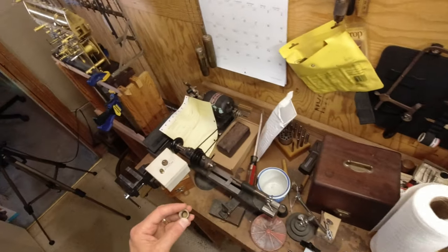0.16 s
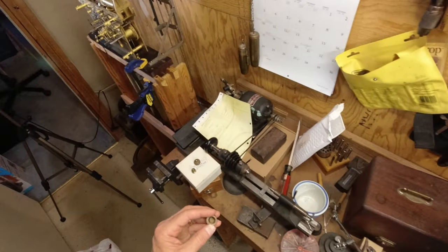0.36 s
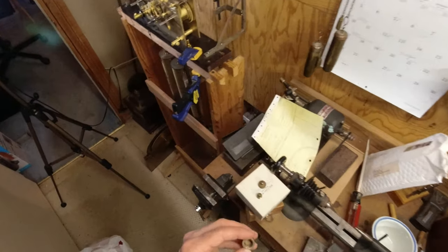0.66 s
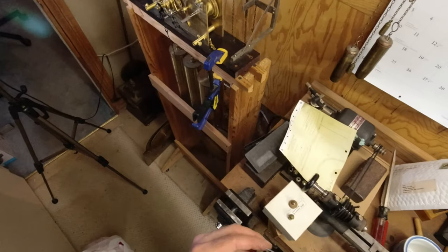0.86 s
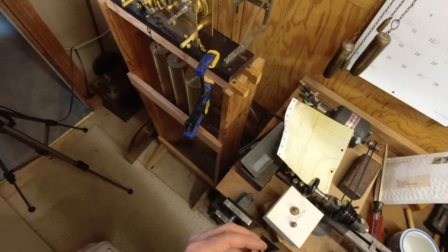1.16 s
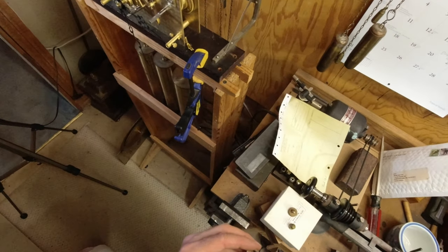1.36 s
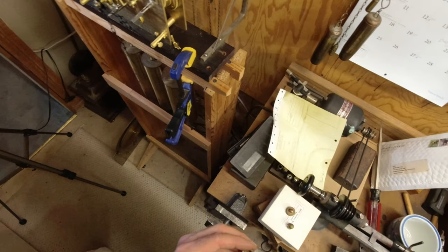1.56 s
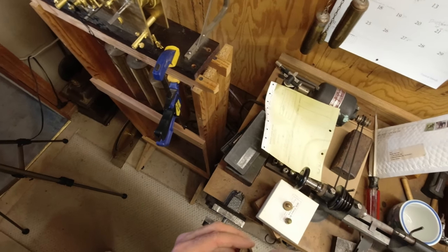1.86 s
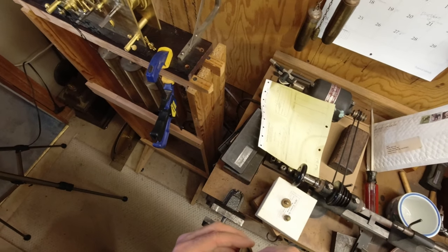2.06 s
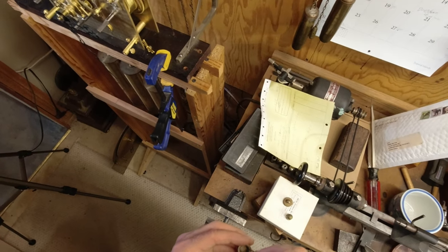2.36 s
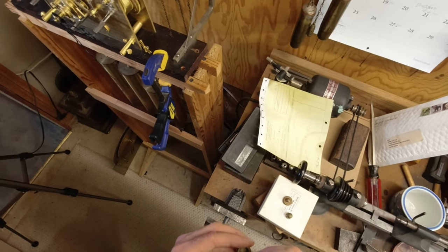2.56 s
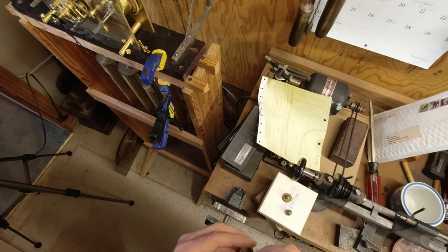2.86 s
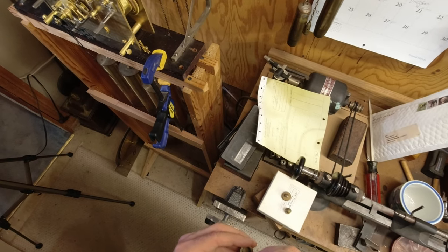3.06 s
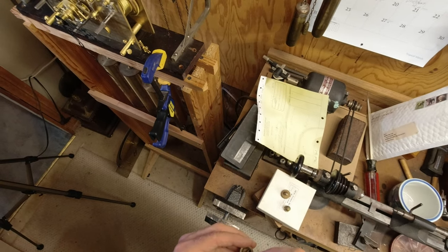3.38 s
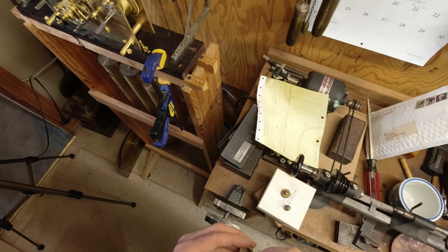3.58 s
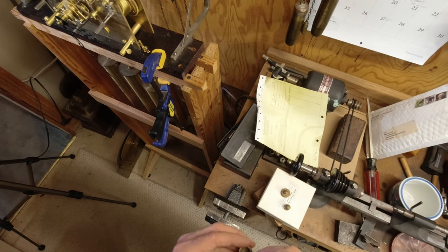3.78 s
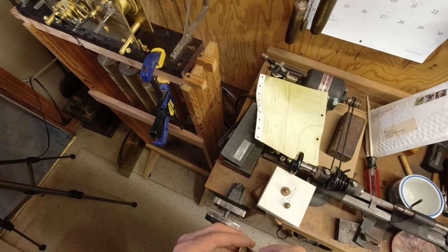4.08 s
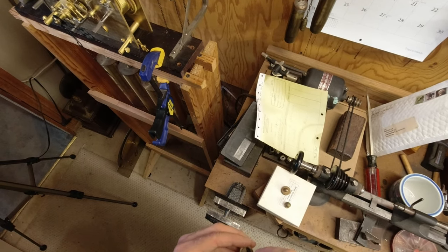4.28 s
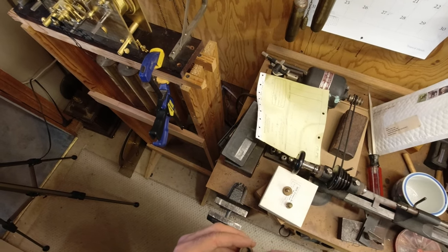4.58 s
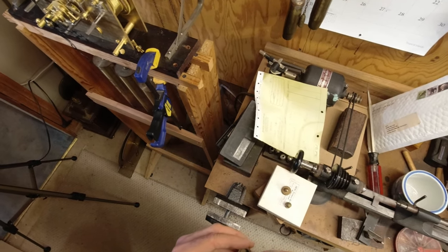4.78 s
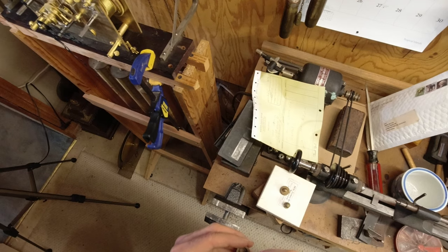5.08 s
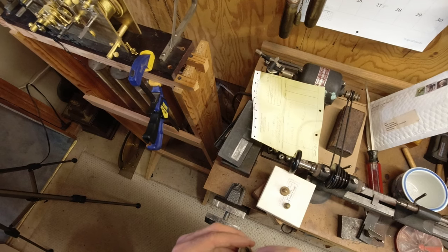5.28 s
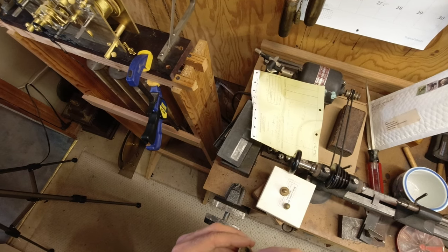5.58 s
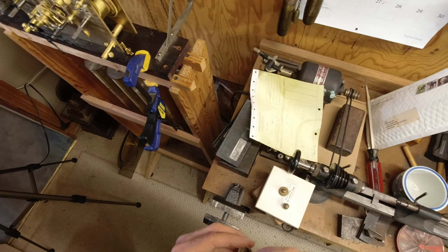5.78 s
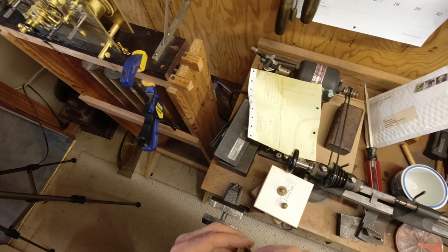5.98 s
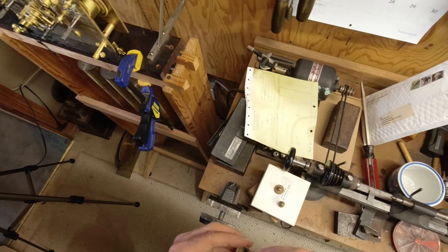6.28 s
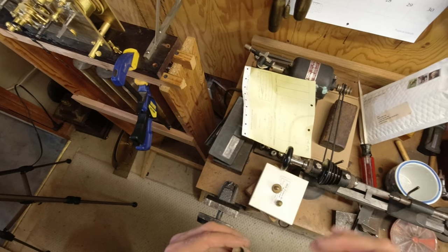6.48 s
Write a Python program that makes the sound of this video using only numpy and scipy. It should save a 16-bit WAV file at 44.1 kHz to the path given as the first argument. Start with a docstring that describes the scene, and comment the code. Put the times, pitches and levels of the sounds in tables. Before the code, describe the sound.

At 0 s a small hard part lands on a wooden bench: a loud sharp knock, rocking through several contacts within 0.04 s, hollow and woody with a short ring, slightly right. Low handling bumps and faint clicks follow up to 0.2 s. From 0.83 to 1.3 s a sleeve rubs over the wood in uneven slips, growing then stopping, with small metallic clicks near 0.86, 0.9 and 1.2 s. A pendulum clock ticks softly at about 0.13, 1.13, 2.13, 3.13, 4.13, 5.13 and 6.13 s, the first nearly masked; alternating beats are dry, woody-metallic, blurred by the small room. Very faint part clicks occur around 3, 3.3, 4, 5.1, 5.5 and 6.3 s, with dull thumps near 3.1, 3.7, 4.5, 5 and 6.1-6.3 s. A faint wavering low hum swells around 1, 3.5 and 4-5.5 s, higher after 6.3 s. Low rumble and soft air rush persist throughout.

```python
"""A part lands on a workbench with a rocking knock: noise bursts and damped modes of wood and part.
A pendulum clock beats once a second in the small shop: two pallets' noise and modes, blurred by the walls.
Small parts click as damped narrow noise; a sleeve slides over the bench as noise in uneven slips.
Soft handling thumps are brief low sines; a low drone swells as a wavering, sinking sine.
Beneath lie a rumble and a rush of air: shaped noise at wandering levels."""
import sys
import numpy as np
from scipy import signal
from scipy.fft import rfft, irfft, next_fast_len
from scipy.io import wavfile
from scipy.ndimage import map_coordinates

SR = 44100
rng = np.random.default_rng(int(sys.argv[2]) if len(sys.argv) > 2 else 0)


def dump(signal):
    """Clip the signal to [-1, 1] and save it as 16-bit WAV at the path in sys.argv[1]."""
    limited = np.clip(np.atleast_2d(signal).T, -1, 1)
    pcm = np.round(limited * 32767).astype(np.int16)
    wavfile.write(sys.argv[1], SR, pcm)


N = 292824


def amp(db):
    """Decibels to gain."""
    return 10 ** (np.asarray(db) / 20)


def unit(x):
    """Scale to rms 1."""
    return x / np.sqrt(np.mean(x ** 2) + 1e-20)


def seconds(length_s):
    """Sample times of a sound of the given length."""
    return np.arange(int(length_s * SR)) / SR


def along(points, hz):
    """(hz, value) points read on a log frequency axis."""
    point_hz, value = np.transpose(points)
    return np.interp(np.log(hz + 1), np.log(point_hz + 1), value)


def curve(rows):
    """(time_s, value) points read at every sample."""
    time_s, value = np.transpose(rows)
    return np.interp(np.arange(N) / SR, time_s, value)


def wobble(rate_hz):
    """Smooth random curve, rate_hz knots a second."""
    knots = rng.standard_normal(int(N * rate_hz / SR) + 4)
    return map_coordinates(knots, [np.arange(N) * rate_hz / SR])


def filtered(x, response):
    """x times a response of frequency."""
    size = x.shape[-1]
    padded = next_fast_len(size + SR // 4)
    spectrum = rfft(x, padded) * response(np.fft.rfftfreq(padded, 1 / SR))
    return irfft(spectrum, padded)[..., :size]


def noise(colour, alike, size):
    """Stereo noise of rms 1 with a given colour and left-right correlation."""
    def mid_side_gain(hz):
        turn = np.arccos(np.clip(along(alike, hz), -1, 1)) / 2
        return colour(hz) * np.array([np.cos(turn), np.sin(turn)])

    mid, side = filtered(rng.standard_normal((2, size)), mid_side_gain)
    return unit(np.array([mid + side, mid - side]))


def shape(points):
    """Gain of frequency from (hz, db) points."""
    return lambda hz: amp(along(points, hz))


def resonance(centre_hz, width_hz):
    """Gain of frequency of one steep-sided resonance."""
    return lambda hz: 1 / (1 + (2 * (hz - centre_hz) / width_hz) ** 2)


def body(modes):
    """Gain of frequency of several (hz, width_hz, db) resonances."""
    return lambda hz: sum(amp(db) * resonance(centre, width)(hz) for centre, width, db in modes)


def ripple(depth_db, spacing_hz):
    """Gain of frequency with the random peaks and dips of a small room."""
    knots = rng.standard_normal(4096)
    return lambda hz: amp(depth_db * map_coordinates(knots, [hz / spacing_hz], mode="mirror"))


def reflections(size, rate_hz=900):
    """Impulses of random strength at random delays, about rate_hz a second; rms 1."""
    return unit(rng.standard_normal(size) * (rng.random(size) < rate_hz / SR))


def causal(points, size):
    """Minimum-phase, unit-peak answer to a sharp push with a given (hz, db) spectrum."""
    cepstrum = irfft(np.log(shape(points)(np.fft.rfftfreq(size, 1 / SR))), size)
    cepstrum[1:size // 2] *= 2
    cepstrum[size // 2:] = 0
    pulse = irfft(np.exp(rfft(cepstrum)), size)
    return pulse / np.abs(pulse).max()


def struck(modes, t):
    """Damped (hz, db, t60_s) modes, at slightly new strengths for each blow."""
    out = np.zeros(len(t))
    for hz, db, t60_s in modes:
        decay = amp(db + rng.normal(0, 1) - 60 * t / t60_s)
        out += decay * np.sin(2 * np.pi * (hz * t + rng.random()))
    return out


def swell(start_s, attack_s, end_s, release_s):
    """Gain that rises smoothly from start_s, holds until end_s and falls to nothing."""
    t = np.arange(N) / SR
    ramp = np.minimum((t - start_s) / attack_s, 1 - (t - end_s) / release_s)
    return np.sin(np.pi / 2 * np.clip(ramp, 0, 1))


def add(track, start_s, sound):
    """Mix a sound into the track at start_s."""
    part = track[:, max(round(start_s * SR), 0):]
    part[:, :sound.shape[-1]] += sound[..., :part.shape[-1]]


def leading(x, lead_s):
    """The left channel hears x earlier than the right by lead_s."""
    return filtered(x, lambda hz: np.exp(1j * np.pi * hz * lead_s * np.array([[1], [-1]])))


# left-right correlation of the air rush, clicks, sleeve and noisy parts of the knock: hz, correlation
SHOP_CORRELATION = [(30, 1), (100, 0.92), (300, 0.87), (800, 0.95), (1500, 0.5), (3000, 0.41), (8000, 0.05)]
# left-right correlation of the rumble: hz, correlation
RUMBLE_CORRELATION = [(25, 0.96), (60, 0.99), (130, 0.99)]
# rumble spectrum: hz, density_db_per_hz
RUMBLE_SPECTRUM = [(12, -1.5), (25, -3), (42, -3.5), (62, -2), (85, 1.5), (108, -3.5), (140, -17.5),
                   (200, -26.5), (350, -53.5), (1500, -100)]
# mean rumble level: time_s, level_db
RUMBLE_LEVEL_DB = [(0, -45.5), (1.0, -47.5), (1.9, -52), (2.35, -45.5), (3.0, -50), (3.35, -49.5),
                   (4.7, -47.5), (5.4, -44), (5.9, -50), (6.5, -44.5)]
# spectrum of the air rush before its ripple: hz, density_db_per_hz
AIR_SPECTRUM = [(76, -15.5), (130, -5), (190, -9.5), (260, -11.5), (450, -15.5), (700, -18), (950, -17.5),
                (1300, -23), (2000, -25), (3000, -29.5), (4000, -32), (5000, -38), (8000, -50.5),
                (11000, -71.5)]
# room resonances in the rush: hz, width_hz, level_db
ROOM_MODES = [(217.2, 14, 0.5), (332.2, 14, 0.5), (461, 16, 0.5), (596.6, 12, 1.5), (642, 20, -1.5),
              (734, 55, -4.5), (807.5, 24, -0.5), (845.3, 19, -1.5), (1171.5, 18, -6), (1432, 22, -7),
              (1520, 17, -16.5), (1886, 30, -11), (2060, 130, -15.5)]
# mean level of the rush, which dips and slowly returns: time_s, level_db
AIR_LEVEL_DB = [(.2, -53.5), (.9, -52.5), (1.4, -57), (2.9, -55.5), (6.6, -53.5)]
RUMBLE_SWING_DB, AIR_SWING_DB = 2, 1  # scale of the random wander


def room(air_db=0.25, modes_db=-4):
    """A slowly wandering rumble and a rush of air coloured by the room's resonances."""
    rumble_db = curve(RUMBLE_LEVEL_DB) + RUMBLE_SWING_DB * wobble(5)
    rumble = amp(rumble_db) * noise(shape(RUMBLE_SPECTRUM), RUMBLE_CORRELATION, N)
    modes = noise(body(ROOM_MODES), SHOP_CORRELATION, N)
    crowded = ripple(depth_db=1.8, spacing_hz=28.1)  # higher resonances too close to tell apart

    def colour(hz):
        return shape(AIR_SPECTRUM)(hz) * crowded(hz) ** np.clip(hz / 1000, 0, 1)

    flow = noise(colour, SHOP_CORRELATION, N)
    rush_db = curve(AIR_LEVEL_DB) + AIR_SWING_DB * wobble(7.1)
    return rumble + amp(rush_db) * (amp(air_db) * flow + amp(modes_db) * modes)


# drone swells: start_s, length_s, start_pitch_hz, level_db (before flutter)
DRONE_SWELLS = [(0.506, 0.96, 105.3, -49), (3.097, 1, 128.4, -54.5), (4.099, 0.57, 134.2, -52.5),
                (4.498, 0.52, 150.7, -55.5), (4.797, 0.89, 120.1, -45), (5.048, 0.65, 161, -57),
                (6.306, 0.83, 258, -57)]
SAG_HZ_PER_S = 3.3


def drone(flutter_db=3.0, waver_hz=3):
    """A low tone comes and goes, wavering and sinking in each swell."""
    out, t = np.zeros(N), np.arange(N) / SR
    for start_s, length_s, start_hz, level_db in DRONE_SWELLS:
        half_s = length_s / 2
        pitch_hz = start_hz - SAG_HZ_PER_S * (t - start_s) + waver_hz * wobble(22)
        tone = unit(np.sin(2 * np.pi * np.cumsum(pitch_hz) / SR))
        out += amp(level_db) * swell(start_s, half_s, start_s + half_s, half_s) * tone
    return out * amp(flutter_db * wobble(25))


# soft handling thumps: start_s, level_db, pitch_hz, length_s (twice the time to the peak)
HANDLING_THUMPS = [(0.063, -26, 23, 0.04), (0.083, -22.5, 52, 0.012), (0.121, -29.5, 34, 0.059),
                   (0.886, -39, 62, 0.035), (1.0, -47.5, 148, 0.054), (3.09, -41, 89, 0.049),
                   (3.683, -36, 65, 0.044), (4.499, -41, 99, 0.033), (4.967, -30, 60, 0.015),
                   (6.122, -35.5, 29, 0.057), (6.259, -30.5, 19, 0.049), (6.287, -30.5, 51, 0.051)]


def thumps():
    """Each soft push is a low sine that swells and dies away."""
    out, t = np.zeros((2, N)), seconds(0.5)
    for start_s, level_db, pitch_hz, length_s in HANDLING_THUMPS:
        u = 2 * t / length_s
        add(out, start_s, amp(level_db) * u * np.exp(1 - u) * np.sin(2 * np.pi * pitch_hz * t))
    return out


# small parts touching: start_s, level_db, pitch_hz, scrape_db (relative to ring), t60_s
PART_CLICKS = [(0.128, -57, 3470, -5, 0.28), (0.184, -50.5, 1700, -8, 0.12), (.8615, -47, 3100, -6, 0.15),
               (.862, -45, 2000, -16, .12), (0.909, -52, 2360, -6, .16), (1.221, -54, 3240, -6, 0.097),
               (2.99, -70.5, 3720, 10.5, 0.18), (3.298, -65, 2500, 3, 0.1), (3.622, -72, 4380, 9, 0.12),
               (3.981, -56, 2970, -8, .13), (3.978, -63.5, 3640, -10, .17), (4.415, -70.5, 4330, 7, 0.18),
               (5.108, -56.5, 1150, -3, 0.2), (5.509, -71, 4700, 6, .2), (5.528, -66, 4400, 5, 0.11),
               (6.290, -61.5, 4200, 3, 0.16), (6.3555, -52.5, 3400, -9, .05), (6.356, -67, 4150, -6, .06)]
# scrape spectrum: hz, density_db_per_hz
SCRAPE_SPECTRUM = [(700, -11.5), (2000, 9.5), (3500, 6), (5200, 0), (6500, -18), (9000, -43)]


def clicks(width_hz=420):
    """Small metal parts touch: one brief, damped resonance mixed with weaker or stronger scrape."""
    out, t = np.zeros((2, N)), seconds(0.25)
    attack = 1 - np.exp(-t / 0.00065)
    for start_s, level_db, pitch_hz, scrape_db, t60_s in PART_CLICKS:
        ring = noise(resonance(pitch_hz, width_hz), SHOP_CORRELATION, len(t))
        scrape = amp(scrape_db) * noise(shape(SCRAPE_SPECTRUM), SHOP_CORRELATION, len(t))
        add(out, start_s, (ring + scrape) * amp(level_db - 60 * t / t60_s) * attack)
    return out


# rubbed wood spectrum: hz, density_db_per_hz
RUB_SPECTRUM = [(130, -17), (300, -11), (400, -2.5), (450, -0.5), (480, 9), (525, -6), (600, 1.5),
                (680, -5), (760, -13), (850, -16), (1200, -23), (2200, -67.5)]
# cloth spectrum, before the treble cut: hz, density_db_per_hz
CLOTH_SPECTRUM = [(350, -18), (650, -5.5), (1000, -3), (1350, -2), (2300, -8), (3300, -12.5), (4000, -22),
                  (5000, -25), (6500, -37), (10000, -60)]
# resonances of the rubbed surface: hz, width_hz, level_db
SURFACE_MODES = [(815, 72, 0), (960, 150, 2.5), (1150, 51, 3.5), (1326, 75, -1.5), (1700, 74, 0.5),
                 (2220, 70, -2), (2500, 60, -5.5), (2780, 180, -7), (3400, 150, -9), (3670, 35, -8.5)]
SLIDE_S, SETTLED_S = 0.83, 1.201  # the arm starts to slide, and comes to rest
CLOTH_ATTACK_S, RUB_ATTACK_S, SLIDE_RELEASE_S = 0.17, 0.43, 0.089  # wood joins as weight comes on
PRESS_DB_PER_S = 7  # the rubbing grows as the arm comes down
CATCH_RATE_HZ = 170


def sleeve(rub_db=-42, cloth_db=-49, modes_db=-46, grain_db=0.0, burst_db=1.4, catch_db=-55):
    """Cloth drags over the bench in uneven bursts; the wood joins in as the arm settles."""
    press = amp(PRESS_DB_PER_S * np.minimum(np.arange(N) / SR - SETTLED_S, 0))
    contact = swell(SLIDE_S, CLOTH_ATTACK_S, SETTLED_S, SLIDE_RELEASE_S)
    weight = swell(SLIDE_S, RUB_ATTACK_S, SETTLED_S, SLIDE_RELEASE_S)

    def slips():
        return unit(amp(grain_db * wobble(260) + burst_db * wobble(45.5)))

    wood = amp(rub_db) * noise(shape(RUB_SPECTRUM), SHOP_CORRELATION, N)
    hiss = amp(cloth_db) * noise(shape(CLOTH_SPECTRUM), SHOP_CORRELATION, N)
    hiss += amp(modes_db) * noise(body(SURFACE_MODES), SHOP_CORRELATION, N)
    catches = filtered(reflections(N, CATCH_RATE_HZ), shape(CLOTH_SPECTRUM))
    hiss += amp(catch_db) * unit(catches)  # threads catch and let go
    hiss = filtered(hiss, shape([(5000, -0.5), (8000, -1), (11000, -23)]))
    return press * (slips() * weight ** 2 * wood + slips() * contact ** 2 * hiss)


# reverberation before each sound's life factor: hz, base_t60_s
SHOP_TAIL = [(200, 0.31), (1000, 0.21), (2300, 0.27), (4000, 0.18), (10000, 0.2)]


def dying(x, hold_s, life=1):
    """After hold_s each frequency dies at the room's speed, its t60 scaled by life."""
    hz, t, bins = signal.stft(x, SR, nperseg=256)
    t60_s = life * along(SHOP_TAIL, hz)[:, None]
    fade = amp(-60 * np.maximum(t - hold_s, 0) / t60_s)
    return signal.istft(bins * fade, SR, nperseg=256)[1][:, :x.shape[-1]]


# bench contacts: start_s, level_db, part_ring_db, crack_db (both relative)
BENCH_KNOCKS = [(0.0, -19, -2, -5.5), (.0105, -23.5, -12, -8), (.015, -25.5, -13.5, -9),
                (.037, -27.5, 7.5, -5.5)]
# modes of the bench: hz, mean_level_db, t60_s
BENCH_MODES = [(158, -8.5, 0.15), (214, -4, 0.26), (294, -11, 0.12), (363, -4.5, 0.15), (405.4, 1.5, 0.18),
               (482, 3, 0.16), (500, -1, 0.096), (590, -4, 0.12), (636.4, -3, 0.14), (687, -8, 0.14)]
# modes of the part: hz, mean_level_db, t60_s
PART_MODES = [(963, -3, 0.089), (1032, -0.5, 0.093), (1112, -11.5, 0.098), (1362, -18, 0.11),
              (1486, -17, 0.11), (1800, -18, 0.11), (1880, -23, 0.08), (2260, -22, .12), (2450, -25, 0.13),
              (3052, -31, 0.098)]
# the bench's noisy answer: hz, density_db_per_hz
THUD_SPECTRUM = [(80, -34), (200, -12), (300, -6.5), (450, -1), (690, -4), (830, -13.5), (1050, -17),
                 (1300, -29), (1900, -19.5), (2700, -28), (3150, -28.5), (4000, -33), (6500, -41),
                 (9200, -32), (11000, -59)]
# the contact itself: hz, density_db_per_hz
CRACK_SPECTRUM = [(400, -9), (720, -4), (1000, 3), (1350, -9), (1850, -6), (2600, -9.5), (3100, -7.5),
                  (4200, -27), (8000, -33), (11000, -68)]
# the first push of a contact: hz, level_db
STRIKE_SPECTRUM = [(150, -14), (500, 3), (1100, -1), (1500, -8.5), (2000, -5.5), (2800, -12), (4200, -33),
                   (10000, -47.5)]


def knocks(bench_db=-4.0, thud_db=-2.5, thud_life=0.55, crack_t60_s=0.032, strike_db=7):
    """A part lands and rocks on the bench: sharp strike and crack, the wood's thud, the ring of both."""
    out, t = np.zeros((2, N)), seconds(0.5)
    attack = 1 - np.exp(-t / 0.00034)
    for start_s, level_db, part_db, crack_db in BENCH_KNOCKS:
        ring = amp(bench_db) * (struck(BENCH_MODES, t) + amp(part_db) * struck(PART_MODES, t))
        thud = noise(shape(THUD_SPECTRUM), SHOP_CORRELATION, len(t))
        thud = amp(thud_db) * dying(thud, hold_s=0, life=thud_life)
        crack = amp(-60 * t / crack_t60_s) * noise(shape(CRACK_SPECTRUM), SHOP_CORRELATION, len(t))
        crack += amp(strike_db) * causal(STRIKE_SPECTRUM, len(t))
        add(out, start_s, amp(level_db) * ((ring + thud) * attack + amp(crack_db) * crack))
    return out


# left-right correlation of the clock's noise and modes: hz, correlation
CLOCK_CORRELATION = [(500, 0.94), (1000, 0.88), (2000, 0.88), (3000, 0.91), (4200, 1), (6000, 0.17),
                     (8500, -0.42), (13000, 0.3)]


def ringing(modes, pallet, size, blur):
    """One pallet's modes, each blurred into a narrow band by the many paths to the listener."""
    out = np.zeros((2, size))
    for hz, db, owner in modes:
        if round(owner) == round(pallet):
            mode = noise(resonance(hz, blur * hz), CLOCK_CORRELATION, size)
            out += amp(db) * mode / np.std(mode[:, :SR // 25])
    return out


# broad clack of the movement, one list per pallet: hz, density_db_per_hz
CLACK_SPECTRA = [
    [(300, -20), (600, -12), (1000, 0.5), (1550, -5.5), (2200, 1.5), (2800, -1), (3300, 1.5), (3800, -12.5),
     (4900, -12.5), (6200, -23), (8500, -28.5), (10500, -63)],
    [(300, -35), (600, -13), (1000, -6.5), (1550, -6.5), (2300, 0), (2800, -7), (3300, -11), (4000, -7),
     (5000, -20), (6500, -31.5), (8000, -37), (10500, -74)],
]
# resonances of the plates and wooden stand: hz, level_db, pallet
PLATE_MODES = [(848, -16, 0), (1028, -10, 0), (1290, -9, 0), (1715, -15, 0), (1865, -11.5, 0),
               (2250, -9.5, 0), (2430, -12, 0), (3350, -14, 0), (4090, -15, 0), (4950, -19, 0),
               (774, -9, 1), (1345, -8, 1), (1800, -8, 1), (2260, -7.5, 1), (2390, -11, 1),
               (2640, -12.5, 1), (2860, -17, 1), (3190, -15, 1), (3470, -15, 1), (3970, -12.5, 1),
               (5430, -24, 1), (5800, -23, 1)]
LOWS_HZ, EDGE_HZ = 1050, 5500  # centres of the two bands that vary from beat to beat


def clack(pallet, walls, lows_db, edge_db, t, hold_s=0.02, life=0.8,
          clack_db=-3.0, sharp_db=-5, plates_db=-3, grain_db=0.5):
    """Sharp early reflections stretch the movement's clack into a burst; plates and stand resonate."""
    def colour(hz):
        return shape(CLACK_SPECTRA[pallet])(hz) * walls(hz)

    clumps = unit(amp(grain_db * wobble(450)[:len(t)]))  # reflections arrive in clumps
    wood = amp(clack_db) * clumps * noise(colour, CLOCK_CORRELATION, len(t))
    wood = wood + amp(sharp_db) * unit(filtered(reflections(len(t)), colour))
    wood = wood + amp(plates_db) * ringing(PLATE_MODES, pallet, len(t), blur=0.011)

    def balance(hz):
        lows = lows_db * resonance(LOWS_HZ, 1100)(hz)
        return amp(lows + edge_db * resonance(EDGE_HZ, 1500)(hz))

    return filtered(dying(wood, hold_s, life), balance)


# narrow high bands of noise at the top of each beat: hz, level_db, pallet
HIGH_BANDS = [(7660, -20, 0), (8300, -28.5, 0), (8800, -16.5, 0), (9150, -29, 0), (12770, -20.5, 0),
              (7670, -25, 1), (7820, -21.5, 1), (8170, -20, 1), (8840, -18, 1), (12700, -45, 1)]
TOP_BAND_HZ = 11000  # top_db acts above this
HIGH_ATTACK_S = 0.005


def high_bands(pallet, top_db, spread, t, hold_s=0.028, life=0.6):
    """Narrow high bands of noise at the top of each beat build up briefly and die away."""
    bands = dying(ringing(HIGH_BANDS, pallet, len(t), blur=spread), hold_s, life)
    bands = filtered(bands, lambda hz: amp(top_db * (hz > TOP_BAND_HZ)))
    return (1 - np.exp(-t / HIGH_ATTACK_S)) * bands


def tooth_snap(t, snap_db=-0.5, t60_s=0.038):
    """The tooth lands: a short burst of noise around one resonance."""
    snap = amp(snap_db - 60 * t / t60_s) * noise(resonance(3230, 700), CLOCK_CORRELATION, len(t))
    return filtered(snap, shape([(4500, 4.5), (6500, -9), (10000, -29)]))


# late answer to each beat, before the wall ripple: hz, density_db_per_hz
LATE_SPECTRUM = [(350, -18.5), (800, 4), (1400, 0), (2200, -3.5), (3200, -14.5), (5000, -18), (9000, -52.5)]
# shop resonances that ring on after a beat: hz, width_hz, level_db
LATE_MODES = [(815, 130, -1), (1980, 160, -9), (2260, 120, -4.5), (3280, 50, -15)]


def shop_answer(walls, t, late_db=-8.5, late_t60_s=0.5, modes_db=-11, modes_t60_s=0.55):
    """The shop's diffuse tail and resonances ring on as decaying noise."""
    def colour(hz):
        return shape(LATE_SPECTRUM)(hz) * walls(hz)

    late = amp(late_db - 60 * t / late_t60_s) * noise(colour, CLOCK_CORRELATION, len(t))
    modes = noise(body(LATE_MODES), CLOCK_CORRELATION, len(t))
    return late + amp(modes_db - 60 * t / modes_t60_s) * modes


# escapement beats, pallets in turn: start_s, level_db, lows_db, edge_db, high_db, top_db,
# band_spread (share of band centre)
CLOCK_BEATS = [(.128, -50, -2, -4, -25, 27.5, 0.0073), (1.127, -41, -1, -13.5, -12.5, 24, 0.007),
               (2.130, -43, -0.5, -5, 2.5, -2, 0.016), (3.133, -44, -3, -3, -1, -17, .012),
               (4.130, -43, 1, 0, 2.5, -15, 0.01), (5.128, -44.3, 1.5, 4, 0, 4, 0.011),
               (6.129, -42, 1.5, 2, -7.5, 8.5, 0.023)]
# time constant of the rise, one per pallet: attack_s
PALLET_ATTACK_S = [0.0031, 0.0044]


def clock():
    """The two pallets catch the wheel in turn; each beat is snap, clack, high bands and shop answer."""
    out, t = np.zeros((2, N)), seconds(0.5)
    for beat, (start_s, level_db, lows_db, edge_db, high_db, top_db, spread) in enumerate(CLOCK_BEATS):
        pallet = beat % 2
        rise = 1 - np.exp(-t / PALLET_ATTACK_S[pallet])
        walls = ripple(depth_db=3.5, spacing_hz=54.0)
        sound = clack(pallet, walls, lows_db, edge_db, t)
        sound = sound + amp(high_db) * high_bands(pallet, top_db, spread, t)
        sound = sound + tooth_snap(t) + shop_answer(walls, t)
        add(out, start_s, amp(level_db) * rise * sound)
    return out


# lead of the left channel; negative: the right leads
CLOCK_LEAD_S, ROOM_LEAD_S, BENCH_LEAD_S = 0.00006, 0.00008, -0.000043


def scene():
    """Clock, clicks, sleeve and room lie to the left, the knock on the bench to the right."""
    left = leading(clock() + clicks() + sleeve(), CLOCK_LEAD_S) + leading(room(), ROOM_LEAD_S)
    return left + leading(knocks(), BENCH_LEAD_S) + thumps() + drone()


TOP_HZ = 13200


def record(dry):
    """Nothing passes at or above the band limit."""
    return filtered(dry, lambda hz: hz < TOP_HZ)


dry = scene()
out = record(dry)
dump(out)
```